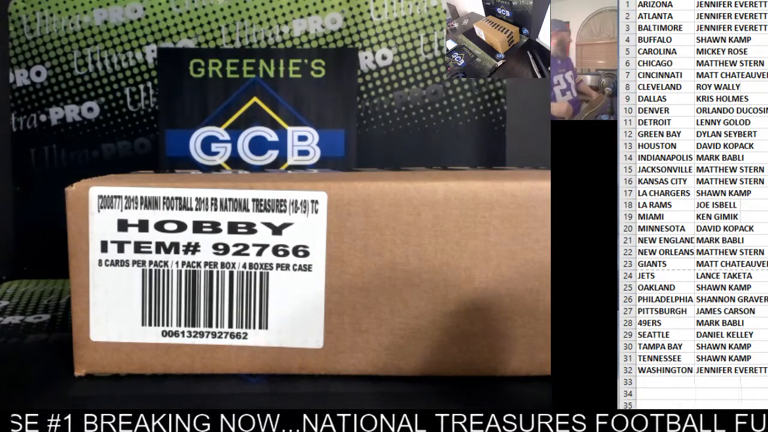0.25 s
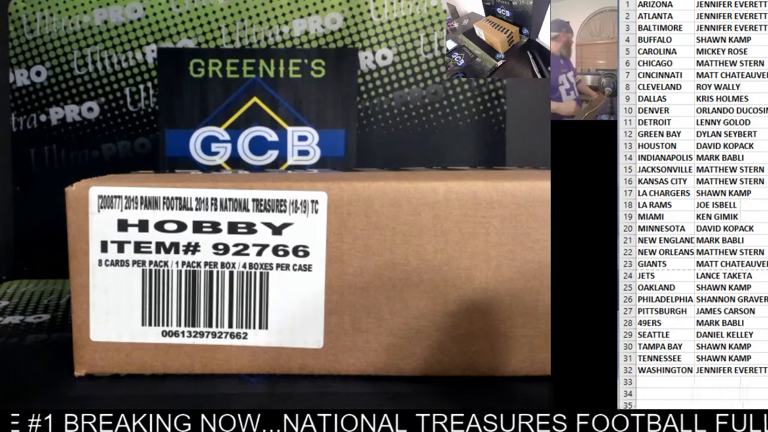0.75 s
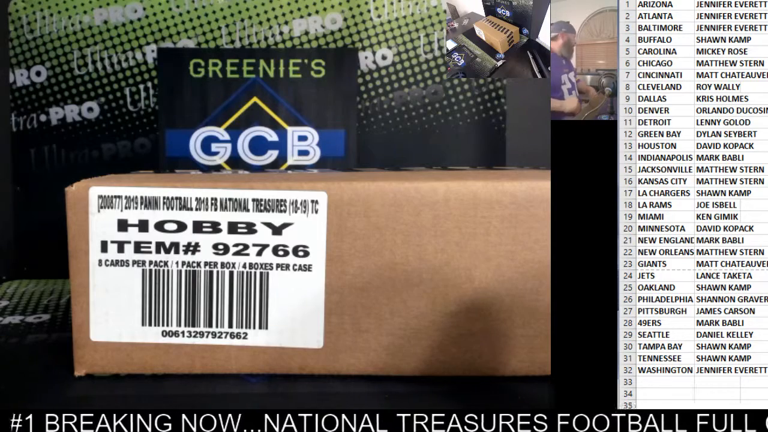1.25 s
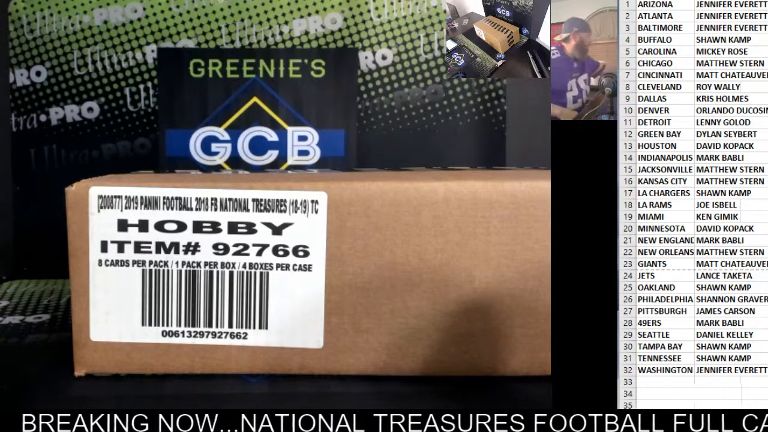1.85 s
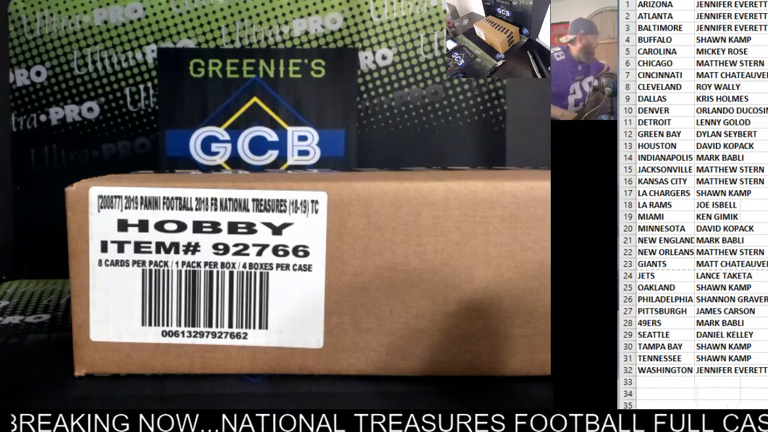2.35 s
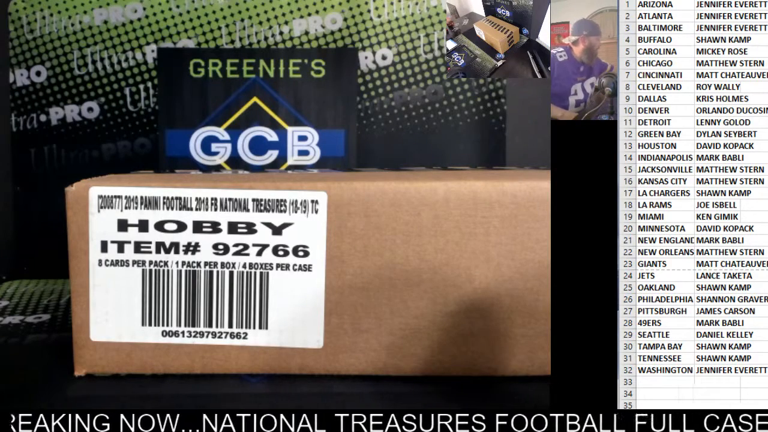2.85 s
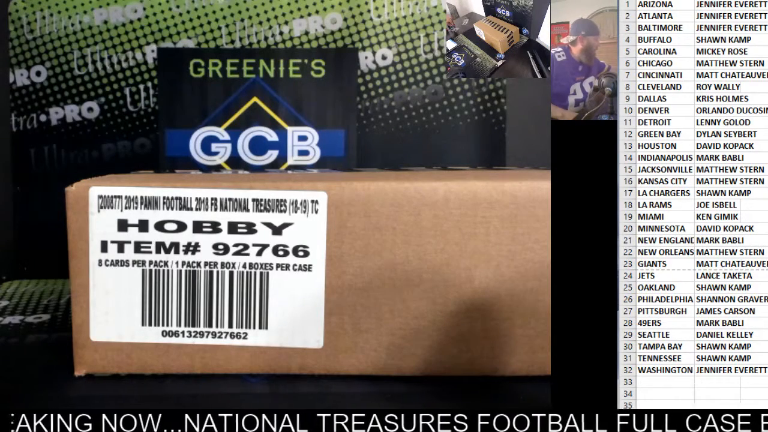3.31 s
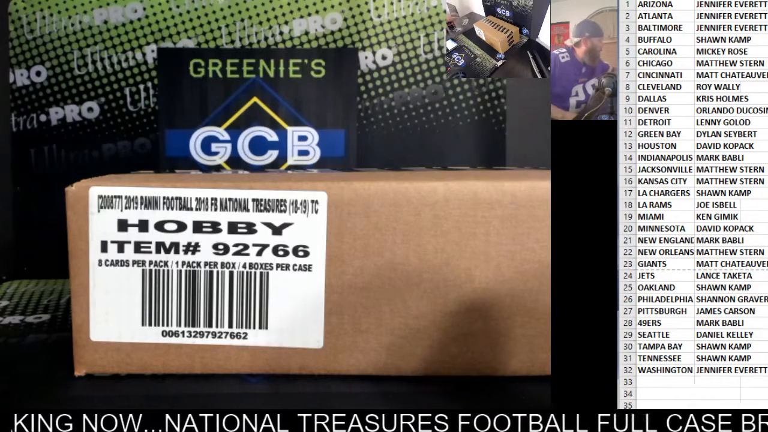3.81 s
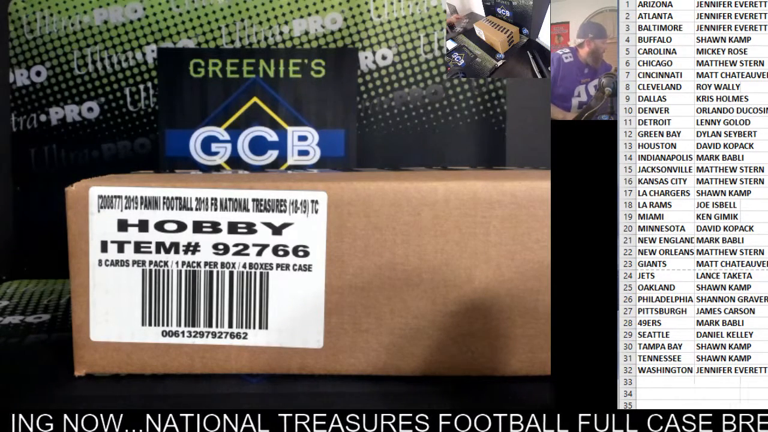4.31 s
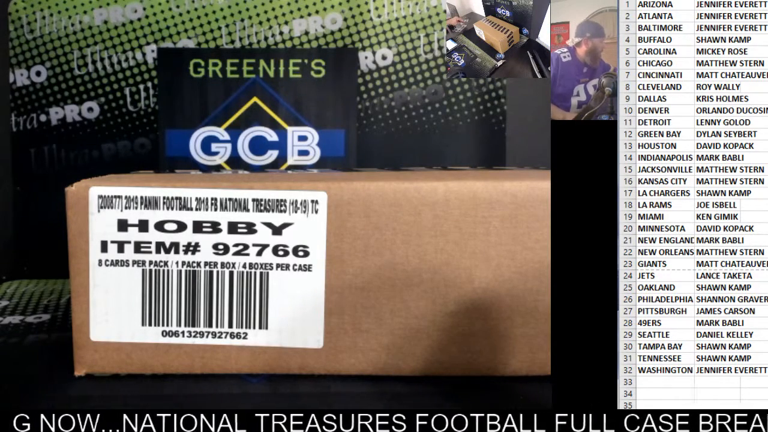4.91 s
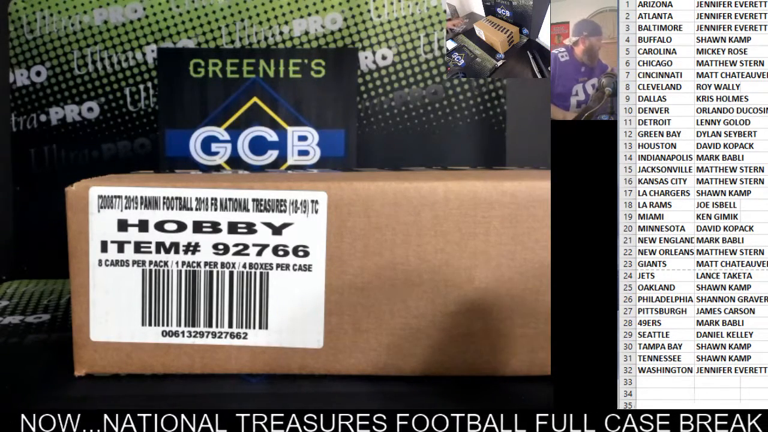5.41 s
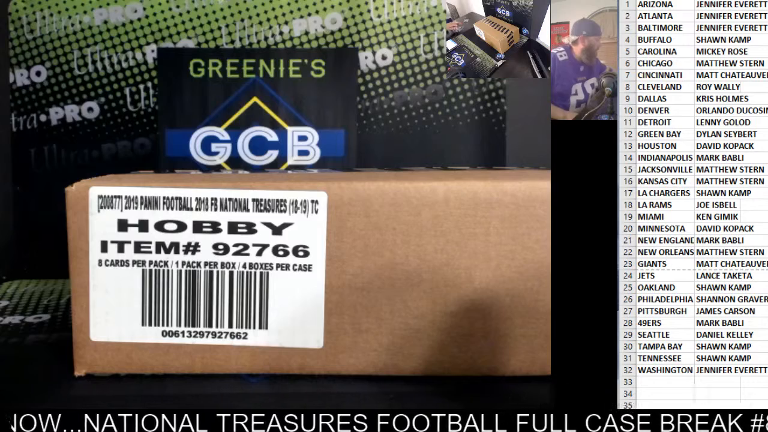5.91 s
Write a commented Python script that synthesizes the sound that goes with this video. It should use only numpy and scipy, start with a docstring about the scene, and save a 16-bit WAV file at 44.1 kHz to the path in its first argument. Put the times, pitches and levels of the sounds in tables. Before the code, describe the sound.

A sleeve brushes softly over a desk, with a few light ticks and one sharp button click. Weight bumps the desk top, then cardboard boxes begin to move, their edges catching and knocking between short, dry scrapes. The pinched cardboard squeaks briefly twice, and a swelling scrape comes last. It all sounds quiet and fairly close in a small room with faint hum, hiss and deep rumble.

```python
"""Cardboard boxes shifted on a desk in a small room, over a bed of faint hum, hiss and slow, deep rumble.
First a sleeve brushes the desk, with a few light ticks, and a button clicks. Weight bumps the desk top.
From about 2 s the boxes move: their edges catch and knock, and their fibres stick and slip in scrapes
that ring the panels. Pinched cardboard squeaks around 3 s and again near 4 s.
More knocks and soft bumps follow, and a swelling scrape closes the scene."""
import sys
import numpy as np
from scipy import signal
from scipy.fft import rfft, irfft, next_fast_len
from scipy.io import wavfile
from scipy.ndimage import map_coordinates

SR = 44100
rng = np.random.default_rng(int(sys.argv[2]) if len(sys.argv) > 2 else 0)


def file_out(sig):
    """Save sig as 16-bit WAV at sys.argv[1]."""
    # one column per channel
    cols = np.atleast_2d(sig).T
    # limit, then scale
    lim = np.clip(cols, -1, 1)
    pcm = np.round(lim * 32767).astype(np.int16)
    wavfile.write(sys.argv[1], SR, pcm)


N = 271656

TREMBLE_DB, TREMBLE_RATE = 1.8, 34  # the hand's unsteady pressure: depth, changes a second


def amp(db):
    """Decibels to gain."""
    return 10 ** (np.asarray(db) / 20)


def unit(x):
    """Scale to rms 1."""
    return x / np.sqrt(np.mean(x ** 2) + 1e-20)


def along(points, hz):
    """Read a curve of (f/Hz, value) points on a log frequency axis."""
    f, v = np.transpose(points)
    return np.interp(np.log(hz + 1), np.log(f + 1), v)


def wobble(rate, size=N):
    """A smooth random modulator, with `rate` new values a second."""
    knots = rng.standard_normal(int(size * rate / SR) + 4)
    return map_coordinates(knots, [np.arange(size) * rate / SR])


def filtered(x, response):
    """Shape x with a complex frequency response."""
    m = next_fast_len(len(x) + SR // 10)
    return irfft(rfft(x, m) * response(np.fft.rfftfreq(m, 1 / SR)), m)[:len(x)]


def band(x, hz, kind):
    """Two-pole low-pass or high-pass."""
    return signal.sosfilt(signal.butter(2, min(hz, SR / 2 - 1), kind, fs=SR, output="sos"), x)


def resonate(x, modes):
    """Ring a body's resonances: parallel band-passes of (f/Hz, width/Hz, level/dB)."""
    return filtered(x, lambda f: sum(amp(db) * 1j * f * width / (hz * hz - f * f + 1j * f * width)
                                     for hz, width, db in modes))


def noise(spectrum):
    """Coloured noise of rms 1."""
    return unit(filtered(rng.standard_normal(N), lambda hz: amp(along(spectrum, hz))))


def add(track, s, sound):
    """Mix a sound into a track at s seconds."""
    part = track[round(s * SR):][:len(sound)]
    part += sound[:len(part)]


def background(hum_hz=120, lump_db=2, lump_rate=9.8):
    """The bed: airy hiss, a slightly unsteady mains hum and a deep rumble that comes in uneven lumps."""
    # colour of the room air and hiss: f/Hz, relative density/dB
    air_colour = [(90, -4), (130, -4), (160, -14), (215, -9), (300, -17), (360, -15), (500, -24),
                  (800, -24), (1200, -21), (2000, -28), (3000, -32), (8000, -35), (16000, -39)]
    # colour of the rumble: f/Hz, relative density/dB
    rumble_colour = [(4.7, -27), (8.0, 3.5), (16, 7.5), (23, -8), (56, -20.5), (92, -38.5), (125, -39),
                     (155, -51.5), (200, -44), (260, -65.5), (440, -120)]
    # slow rise and fall of the rumble: t/s, level/dB
    sway = [(0.0, -61.5), (0.51, -58), (0.62, -48.5), (0.79, -53.5), (1.23, -55.5), (1.51, -43),
            (2.5, -64.5), (2.97, -53), (3.21, -46), (3.26, -52), (3.93, -45.5), (4.08, -53), (4.34, -49),
            (4.85, -61.5), (4.94, -49), (5.51, -54.5), (5.78, -46), (6.16, -46)]
    t = np.arange(N) / SR
    hum = np.sqrt(2) * np.sin(2 * np.pi * hum_hz * t + 0.55 * wobble(4.4))
    sway_db = np.interp(t, *np.transpose(sway))
    rumble = amp(sway_db + lump_db * wobble(lump_rate)) * noise(rumble_colour)
    return amp(-82.5) * noise(air_colour) + amp(-87) * hum + rumble


def room(x, wet_db, onset_s=0.00094):
    """A small room: early reflections and a short tail off the walls, whose treble dies first."""
    # decay of the tail: f/Hz, t60/s
    decay = [(200, 0.54), (1400, 0.34), (4000, 0.28), (12000, 0.2)]
    # reflections off the nearest surfaces: delay/s, level/dB
    echoes = [(.0021, -19), (.0095, -24), (.015, -22)]
    hz, t, spectra = signal.stft(rng.standard_normal(SR // 2), SR, nperseg=256)
    tail = signal.istft(spectra * amp(-60 * t / along(decay, hz)[:, None]), SR, nperseg=256)[1]
    tail *= np.clip(np.arange(len(tail)) / SR / onset_s - .5, 0, 1)
    impulse = amp(wet_db) * tail / np.linalg.norm(tail)
    for delay, db in echoes:
        impulse[round(delay * SR)] += amp(db)
    return x + signal.fftconvolve(x, impulse)[:N]


def desk_bumps(t60=0.19, rise_s=0.007):
    """Weight shifts onto the desk, which gives a few heavily damped swings."""
    # soft thuds through the desk: t/s, level/dB, f/Hz
    thuds = [(1.65, -55.5, 75.3), (1.799, -51.5, 45.2), (1.887, -55.5, 64.5), (3.19, -49.5, 58.4),
             (3.43, -60, 88.4), (3.76, -59, 70.4), (3.9, -52, 34.4), (4.279, -63, 74), (5.928, -55, 91),
             (6.109, -56, 94)]
    out, t = np.zeros(N), np.arange(SR // 4) / SR
    attack = 1 - np.exp(-t / rise_s)
    for s, db, hz in thuds:
        add(out, s, amp(db - 60 * t / t60) * attack * np.sin(2 * np.pi * hz * t))
    return out


def sleeve():
    """Cloth brushes the desk; each pass swells and fades as it speeds up and slows down."""
    # passes of the sleeve: middle t/s, length/s, level/dB
    passes = [(.01, 0.19, -78.5), (0.228, 0.49, -87.5), (0.603, 0.49, -79), (0.782, 0.2, -80),
              (1.17, 0.55, -88.5), (1.542, 0.49, -81)]
    # colour of cloth on the desk top: f/Hz, relative density/dB
    cloth_colour = [(150, -10.5), (250, -1.5), (500, -10.5), (850, -11), (1220, -0.5), (1600, -9.5),
                    (2700, -19.5), (4500, -19), (8000, -24), (15000, -30.5)]
    t = np.arange(N) / SR
    speed = sum(amp(db) * np.cos(np.pi * np.clip((t - s) / length, -.5, .5)) ** 2
                for s, length, db in passes)
    return speed * amp(TREMBLE_DB * wobble(TREMBLE_RATE)) * noise(cloth_colour)


def ticks(t60=0.011):
    """Light touches, each a brief ring blurred by a wandering phase."""
    # touches: t/s, level/dB, f/Hz
    touches = [(0.351, -76, 13000), (0.384, -67, 9800), (1.831, -61, 324), (5.092, -81, 8900)]
    out, t = np.zeros(N), np.arange(SR // 10) / SR
    for s, db, hz in touches:
        blur = np.cumsum(rng.standard_normal(len(t))) * np.sqrt(hz / SR) * 0.52
        add(out, s, amp(db - 60 * t / t60) * np.sin(2 * np.pi * hz * t + blur))
    return out


def button_click(s=1.2533, low_cut_hz=600):
    """A button snaps: a few cycles of heavily damped resonances, too small to radiate bass."""
    # modes of the button's shell: f/Hz, level/dB, t60/s
    shell = [(1380, -46, 0.0089), (1890, -42.5, 0.0032), (3930, -49.5, 0.0012)]
    out, t = np.zeros(N), np.arange(SR // 20) / SR
    add(out, s, sum(amp(db - 60 * t / t60) * np.sin(2 * np.pi * hz * t) for hz, db, t60 in shell))
    return band(out, low_cut_hz, "highpass")


def squeaks(overtone_step_db=-9):
    """Slips nearly lock to one resonance: a hoarse, narrow band with overtones glides, swells and fades."""
    # pinched cardboard: t/s, length/s, start f/Hz, end f/Hz, level/dB
    pinches = [(2.892, 0.16, 1986, 2050, -72), (2.966, 0.16, 1750, 1440, -65.5),
               (3.12, 0.096, 2150, 2230, -75), (2.993, 0.06, 4740, 4340, -72),
               (3.179, 0.053, 2450, 2200, -77), (4.086, 0.11, 571, 616, -73)]
    out = np.zeros(N)
    for s, length, start_hz, end_hz, db in pinches:
        n = int(length * SR)
        blur_rate = 90 + .03 * start_hz  # higher squeaks spread over a wider band
        phase = 2 * np.pi * np.cumsum(np.linspace(start_hz, end_hz, n)) / SR
        swell = np.sin(np.linspace(0, np.pi, n))
        for k in range(1, 4):
            tone = wobble(blur_rate, n) * np.cos(k * phase) + wobble(blur_rate, n) * np.sin(k * phase)
            add(out, s, amp(db + overtone_step_db * (k - 1)) * swell * unit(tone))
    return out


def hand_pressure(length, swell_db, grip_s=0.018, let_go_s=0.012):
    """A hand takes hold, pushes ever harder or softer with a slight tremble, and lets go."""
    t = np.arange(SR // 3) / SR
    hold_db = swell_db * (np.minimum(t / length, 1) - .5) + TREMBLE_DB * wobble(TREMBLE_RATE, len(t))
    attack = np.minimum(t / grip_s, 1)
    release = np.exp(-np.maximum(t - length, 0) / let_go_s)
    return attack * amp(hold_db) * release


def scrape(n, panel, grit_db, clump_db=1.0, shift_db=3.5, slips_per_s=5000, detune=0.035):
    """Fibres stick and slip in random clumps; the moving contact favours one panel mode, then another."""
    # tone of the grit, soft fibres giving little top treble: f/Hz, gain/dB
    fibre_eq = [(2600, -0.5), (3400, 12), (8800, 6), (10000, 2), (16000, -5)]
    slip_sizes = rng.standard_normal(n) * amp(clump_db * wobble(136, n))
    force = slip_sizes * (rng.random(n) < slips_per_s / SR)
    # every new grip detunes the panel a little
    modes = [(hz * np.exp(detune * rng.standard_normal()), width, db) for hz, width, db in panel]
    ring = sum(amp(shift_db * wobble(19.0, n)) * resonate(force, [mode]) for mode in modes)
    coarse = unit(band(ring, 1660, "lowpass"))
    grit = unit(filtered(band(ring, 3940, "highpass"), lambda hz: amp(along(fibre_eq, hz))))
    return coarse - amp(grit_db) * grit


def box_slides():
    """Cardboard slides over cardboard and over the desk: each stroke is a scrape under hand pressure."""
    # panel modes when held tightly, held loosely or dragged on the desk: f/Hz, width/Hz, level/dB
    tight_panel = [(313, 106, 7.5), (674, 265, 5), (1570, 620, 11.5), (1976, 240, 12), (3330, 1200, -8),
                   (4360, 460, 2), (5050, 700, -24), (7500, 270, 3), (7900, 560, -14), (12700, 3800, -10)]
    loose_panel = [(650, 240, -4.5), (1220, 230, 2.5), (1524, 420, -1), (2134, 230, 13.5), (3150, 720, 8.5),
                   (4440, 230, -2.5), (4940, 1130, 7.5), (6330, 660, 7), (7440, 160, 17.5), (8100, 440, 6),
                   (9800, 1500, -34)]
    desk_panel = [(291, 112, 3), (537, 68, 3.5), (768, 142, 7.5), (1205, 170, -1), (1510, 620, 1),
                  (2104, 280, 2), (4680, 1100, -21.5), (5570, 320, -16), (7860, 240, -6),
                  (12700, 1800, -13)]
    # strokes: t/s, length/s, level/dB, grit/dB re level, swell over the stroke/dB, rubbed panel
    strokes = [(2.115, 0.1, -68.5, -9.5, 12, "tight"), (2.212, 0.073, -65, 1, -16.5, "tight"),
               (2.339, 0.059, -67, -4, 0, "tight"), (2.43, 0.14, -80.5, -15, 14, "desk"),
               (2.591, 0.039, -64, 1, -8.5, "loose"), (2.893, 0.057, -68, -8, -12, "tight"),
               (2.942, .15, -67, 1.5, -0.5, "tight"), (3.109, 0.11, -74, 1, 1, "tight"),
               (3.182, 0.097, -66.5, -4.5, -9.5, "tight"), (3.3, 0.087, -68, -1, -11, "desk"),
               (3.411, 0.25, -68, -4.5, -7.5, "desk"), (3.67, 0.081, -65.5, -1.5, -2.5, "desk"),
               (4.071, 0.036, -80.5, -9, 4, "loose"), (4.099, 0.051, -62.5, -1, 7, "loose"),
               (4.161, 0.13, -65, -4.5, -6, "loose"), (4.442, 0.047, -61.5, -15, -30, "loose"),
               (4.556, 0.026, -70, -5.5, 10, "tight"), (5.338, 0.088, -66.5, -7.5, -10, "desk"),
               (5.529, 0.063, -68.5, -5.5, 3, "desk"), (5.63, .14, -77, -12.5, -1, "desk"),
               (5.79, 0.23, -69.5, -10, 6, "desk"), (6.02, 0.21, -63.5, -3, 10, "loose")]
    out, panels = np.zeros(N), {"tight": tight_panel, "loose": loose_panel, "desk": desk_panel}
    for s, length, db, grit_db, swell_db, panel in strokes:
        pressure = hand_pressure(length, swell_db)
        add(out, s, amp(db) * pressure * scrape(len(pressure), panels[panel], grit_db))
    return out


def box_knocks(push_db=2, push_s=.00009, rattle_db=3, rattle_t60=0.04, brush_db=-24,
               body_hz=650, mid_hz=3200, edge_hz=8840, edge_spread=1.365):
    """An edge brushes closer, then gives a cushioned push and a short fibre rattle; all ring the box."""
    # edges striking or catching: t/s, relative strength/dB, body/dB re mids, edge treble/dB re mids
    hits = [(2.2207, -62, -2, 12), (2.3624, -61.5, -4, -10), (2.4122, -76, 13, 18.5),
            (2.5622, -53.5, -1.5, 5), (2.587, -55, -7.5, -3), (2.6058, -56.5, -0.5, -1.5),
            (2.8987, -75.5, 5, -3), (3.1964, -66.5, -15, -8), (3.3037, -57.5, 6.5, 7), (3.345, -73, 2, 9),
            (3.405, -57.5, -11, 6.5), (3.6727, -58.5, 2, -2), (3.6884, -63, 13.5, 13),
            (3.715, -59.5, -6, 6), (3.7357, -62.5, -1, 10), (4.446, -59, 0, -5), (4.4543, -59, 2.5, 9),
            (4.5282, -58.5, -9, -12.5), (4.5546, -53, -20, -8), (5.3449, -59, -2, 5.5),
            (5.4933, -61.5, -9, -35), (5.6191, -65.5, 11.5, 4.5), (5.7798, -68.5, 5.5, -21),
            (5.8772, -67, -7, -4)]
    # modes of a struck box: f/Hz, width/Hz, level/dB
    box_modes = [(282, 69, 6), (528, 180, 0), (858, 326, -2), (1209, 284, 2.5), (1410, 390, -2),
                 (1890, 310, -2), (2980, 620, -4.5), (4250, 750, -2.5), (5460, 600, -2), (7290, 1170, -2),
                 (8250, 530, -8), (12740, 6000, -12), (15100, 650, -63)]
    out, t = np.zeros(N), np.arange(SR // 8) / SR
    lead = SR // 50  # the brush starts 20 ms ahead of the hit
    for s, db, body_db, edge_db in hits:
        brush = amp(brush_db) * np.linspace(0, 1, lead) * rng.standard_normal(lead)
        push = amp(push_db) * t / push_s * np.exp(1 - t / push_s)
        rattle = amp(rattle_db - 60 * t / rattle_t60) * rng.standard_normal(len(t))
        blow = np.concatenate([brush, rattle - push])
        body = band(blow, body_hz, "lowpass")
        mids = band(band(blow, body_hz, "highpass"), mid_hz, "lowpass")
        edge = band(band(blow, edge_hz / edge_spread ** 2, "highpass"), edge_hz * edge_spread, "lowpass")
        force = amp(db + 7) * (mids - amp(body_db) * body - amp(edge_db) * edge)
        # each contact point weights the modes differently
        modes = [(hz, width, level + 2 * rng.standard_normal()) for hz, width, level in box_modes]
        add(out, s - lead / SR, resonate(force, modes))
    return out


def scene():
    """Mono mix: boxes, ticks and button in the room; sleeve, desk bumps and background stay dry."""
    handling = room(box_knocks() + box_slides() + squeaks() + ticks(), wet_db=-7.5)
    button = room(button_click(), wet_db=-11)
    return (handling + button + sleeve() + desk_bumps() + background())[None]


def record(dry, top_hz=15800):
    """A brick-wall low-pass takes off the very top of the treble."""
    return filtered(dry[0], lambda hz: hz < top_hz)[None]


dry = scene()
out = record(dry)
file_out(out)
```